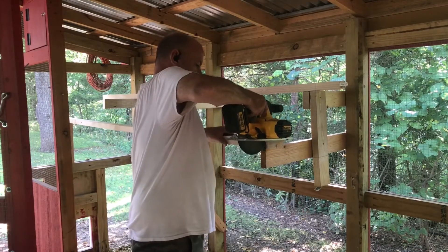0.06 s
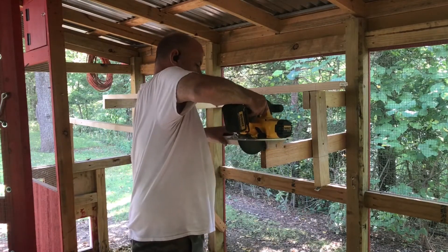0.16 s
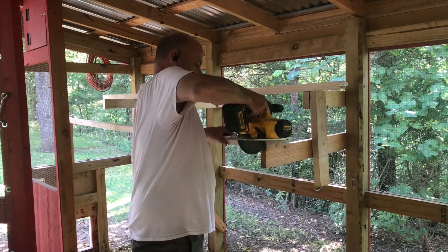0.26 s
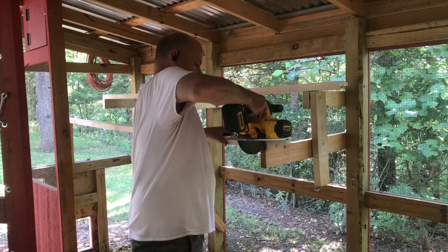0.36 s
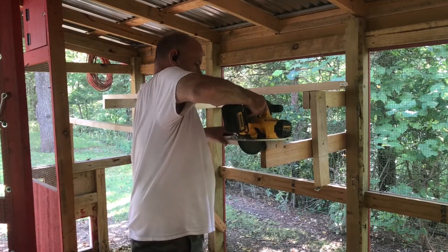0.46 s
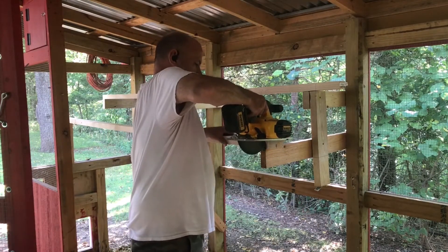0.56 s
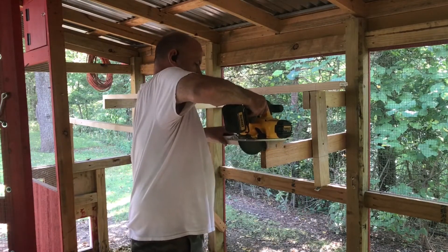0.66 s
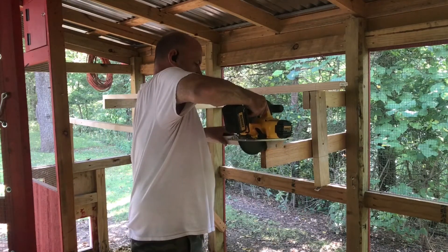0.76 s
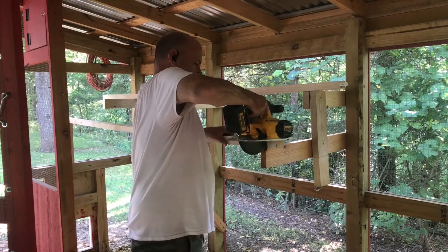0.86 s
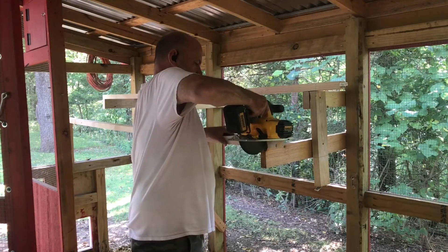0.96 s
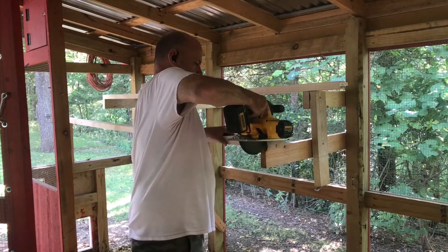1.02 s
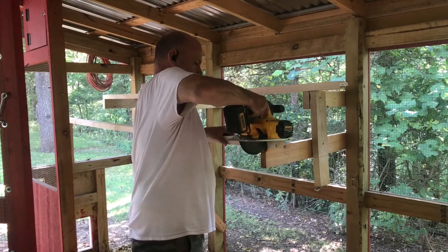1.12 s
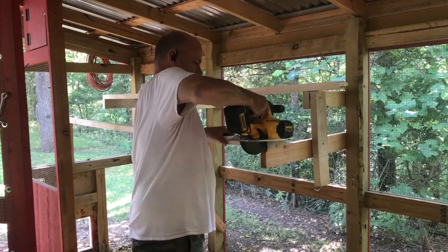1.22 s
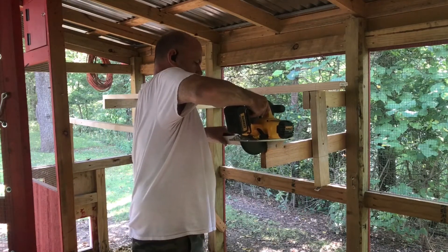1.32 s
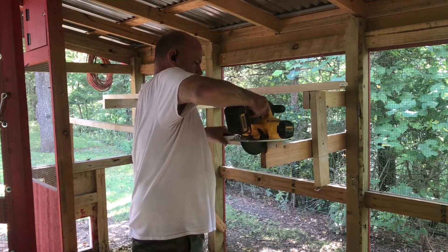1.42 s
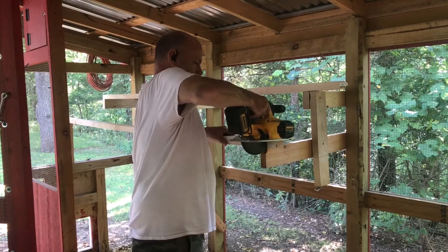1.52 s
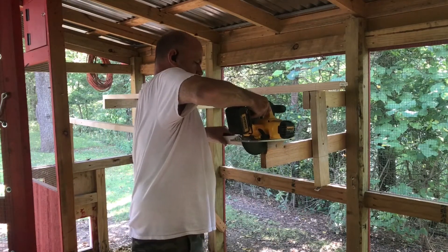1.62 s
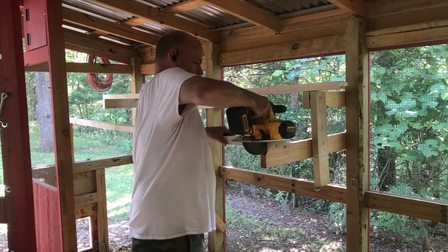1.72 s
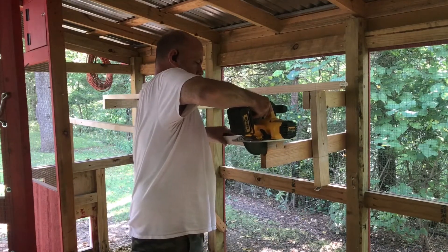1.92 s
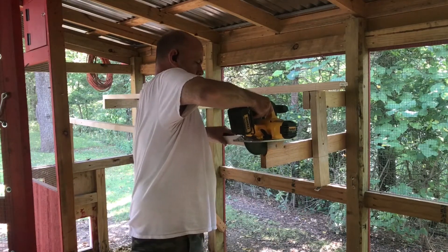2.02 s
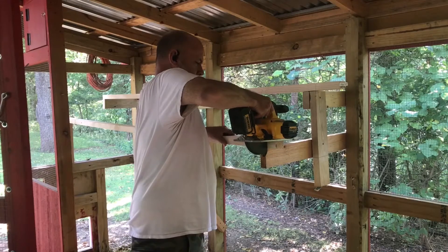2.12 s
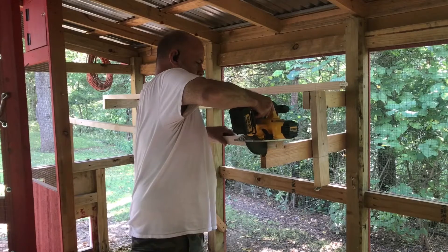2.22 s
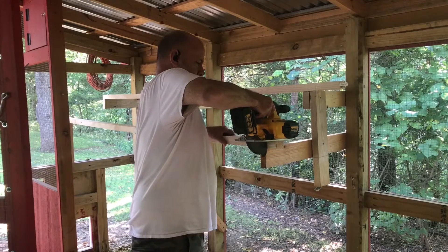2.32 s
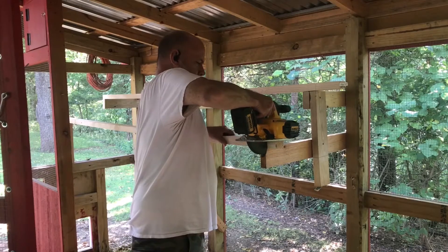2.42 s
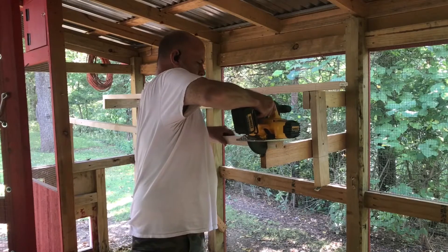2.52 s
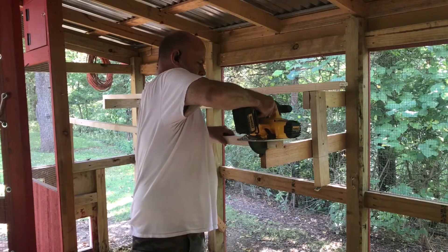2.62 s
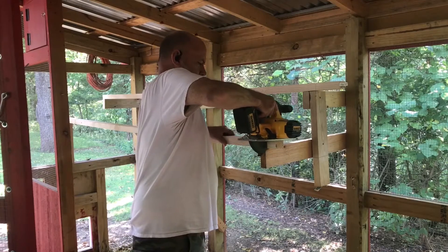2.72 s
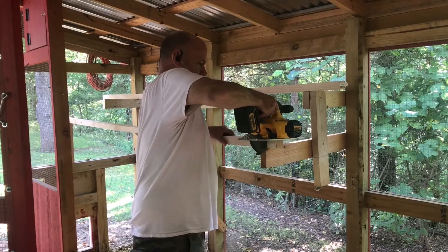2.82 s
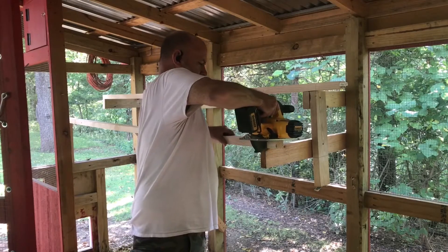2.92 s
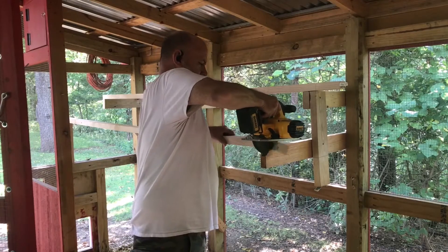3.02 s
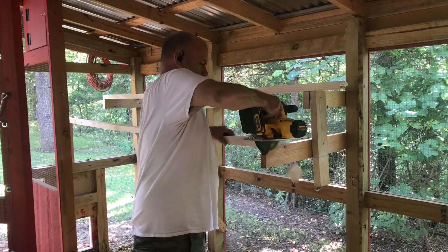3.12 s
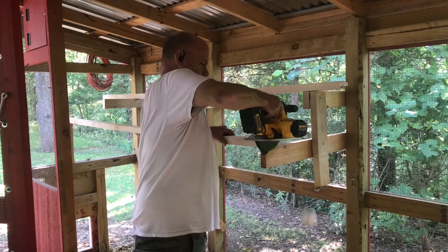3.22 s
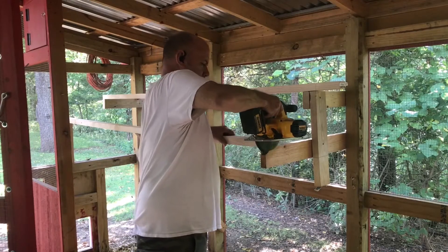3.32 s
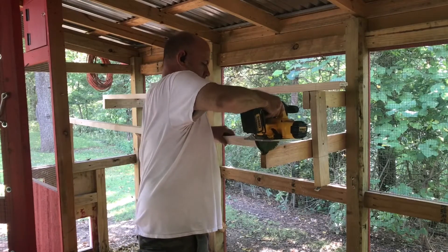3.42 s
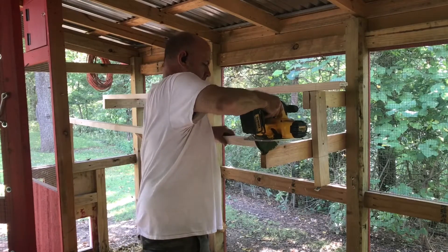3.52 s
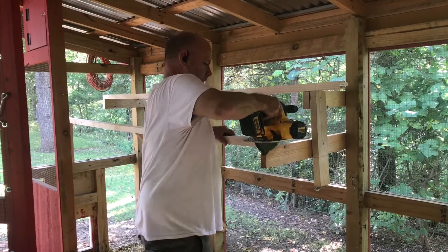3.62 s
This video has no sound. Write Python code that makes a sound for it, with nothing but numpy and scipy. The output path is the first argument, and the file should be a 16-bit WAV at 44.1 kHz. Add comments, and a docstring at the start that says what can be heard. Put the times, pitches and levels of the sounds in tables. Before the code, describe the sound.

A cordless circular saw cuts a wooden board in an open shed, heard fairly near: trigger click, quick spin-up, harsh ringing rasp sagging slightly under load, a short knock, then fast braking and a sharp clack.

```python
"""A cordless circular saw trims a board in an open wooden shed with a tin roof.
Noise bursts, one per tooth, make the rasp and excite the blade's modes; tones locked to the speed make
motor whine, hum and buzz. The speed climbs, sags in the cut and falls under the brake.
Decaying noise makes the clacks of trigger, gears and brake, and a few wavering tones a short knock.
Shaped noise is the air on the microphone and the outdoor hiss; in brief dips the roar yields to clear tones."""
import sys
import numpy as np
from scipy import signal
from scipy.fft import rfft, irfft
from scipy.io import wavfile
from scipy.ndimage import map_coordinates

SR = 44100
rng = np.random.default_rng(int(sys.argv[2]) if len(sys.argv) > 2 else 0)


def log_audio(samples):
    """Write samples as a 16-bit WAV file to the path given in sys.argv[1]."""
    # one column per channel
    frames = np.atleast_2d(samples).T
    # limit to full scale, then quantise
    limited = np.clip(frames, -1, 1)
    pcm = np.round(limited * 32767).astype(np.int16)
    wavfile.write(sys.argv[1], SR, pcm)


N = 160965
TIME = np.arange(N) / SR
WHINE_JITTER, WHINE_FLICKER_DB = .0022, 2.5  # rms share of the pitch; scale of the level flicker


def from_db(db):
    """Level to amplitude: 20 dB is a factor of ten."""
    return 10 ** (np.asarray(db) / 20)


def rms_one(x):
    """Normalization to unit mean power."""
    return x / np.sqrt(np.mean(x ** 2) + 1e-20)


def in_time(rows):
    """Linear interpolation of each column of a curve at every sample."""
    s, *columns = np.transpose(rows)
    return [np.interp(TIME, s, column) for column in columns]


def coloured(x, points):
    """Linear filtering: a spectral envelope, straight in dB over log frequency; unit power."""
    hz, db = np.transpose(points)
    bins = np.maximum(np.arange(N // 2 + 1) * SR / N, 1)
    envelope = from_db(np.interp(np.log(bins), np.log(hz), db))
    return rms_one(irfft(rfft(x) * envelope, N))


def noise(points):
    """Stationary Gaussian noise with a spectral envelope; unit power."""
    return coloured(rng.standard_normal(N), points)


def drift(rate):
    """Low-pass random fluctuation: two equal poles at rate (Hz), unit power."""
    r = np.exp(-2 * np.pi * rate * 10 / SR)  # computed at every tenth sample
    start = rng.standard_normal((N + SR) // 10 + 2)
    slow = signal.lfilter([1], [1, -2 * r, r * r], start)[SR // 10:]  # skip the filter's onset
    return rms_one(np.interp(np.arange(N) / 10, np.arange(len(slow)), slow))


def resonance(x, hz, width_hz):
    """A damped mode: a two-pole resonator driven by x; unit power."""
    r = np.exp(-np.pi * width_hz / SR)
    poles = [1, -2 * r * np.cos(2 * np.pi * hz / SR), r * r]
    return rms_one(signal.lfilter([1, 0, -1], poles, x))


def dying(s, t60):
    """Exponential decay after a sudden start: 60 dB in t60 seconds."""
    return (TIME >= s) * np.exp(-np.log(1000) * np.maximum(TIME - s, 0) / t60)


def tone(hz):
    """Frequency modulation: the phase is the integral of the pitch curve."""
    return np.sqrt(2) * np.sin(2 * np.pi * (np.cumsum(hz) / SR + rng.random()))


def outdoors():
    """Stationary broadband noise: the steady hiss of the surroundings."""
    # spectrum of the hiss: pitch_hz, density_db (relative, per Hz)
    colour = [(88, -39), (150, 11), (221, -35), (350, -23), (850, -12), (991, -16), (2360, -17), (5840, -5),
              (15000, -41)]
    return from_db(-53) * noise(colour)


def buffeting():
    """Turbulent pressure on the microphone: low noise of varying level."""
    # strength of the air: start_s, level_db
    levels = [(0, -51), (.12, -49), (.25, -56), (.45, -48.5), (1.0, -50), (3.1, -50.5), (3.18, -36),
              (3.35, -43), (3.5, -38), (3.65, -43)]
    # spectrum of the air: pitch_hz, density_db (relative, per Hz)
    colour = [(15, -27), (30, 2), (50, 10), (100, 2), (160, -0.5), (300, -8.5), (1000, -41.5)]
    return from_db(in_time(levels)[0]) * noise(colour)


def shed(x):
    """Reverberation: direct sound plus a decaying wash of reflections from posts and roof."""
    delay_s, t60_s, wash_db = .003, .16, -2.5
    wash = rng.standard_normal(N) * dying(delay_s, t60_s)
    reflected = signal.fftconvolve(x, wash / np.linalg.norm(wash))[:N]
    return x + from_db(wash_db) * reflected


def clacks():
    """Impact excitation: trigger, gear slack and brake rattle the housing, which decays."""
    # impacts of trigger, gears and brake: start_s, level_db, t60_s
    impacts = [(0.1149, -26, 0.066), (.168, -49, 0.08), (3.49, -23.5, 0.13), (3.504, -31, 0.053)]
    # spectrum of the housing: pitch_hz, density_db (relative, per Hz)
    colour = [(200, -33), (600, -2.5), (1000, -1), (1430, 2.5), (1950, -3), (2600, 2), (3400, -3.5),
              (5200, 0.5), (7000, -10), (10000, -15), (16000, -71)]
    tail_db, tail_t60_s = -11, .32  # tail relative to each impact
    settle_s, settle_length_s, settle_db = 3.587, .015, -41
    level = 0
    for s, db, t60 in impacts:
        decay = dying(s, t60) + from_db(tail_db) * dying(s, tail_t60_s)
        level = level + from_db(db) * decay
    # a soft rattle as the blade settles
    level = level + from_db(settle_db) * np.exp(-((TIME - settle_s) / settle_length_s) ** 2)

    trigger_s = impacts[0][0]
    # the handle's hollow ring
    hollow = resonance(rng.standard_normal(N), 1480, width_hz=220)
    handle = from_db(-28) * dying(trigger_s, t60=.096) * hollow
    # the switch snaps over: two resonators in series
    crack = resonance(rng.standard_normal(N), 5300, width_hz=2500)
    crack = resonance(crack, 5300, width_hz=2500)
    snap = from_db(-22) * dying(trigger_s, t60=.014) * crack
    # the gears take up their slack
    ping = from_db(-31) * dying(.167, t60=.22) * np.sin(2 * np.pi * 3970 * TIME)
    return level * noise(colour) + handle + ping + snap


def knock():
    """Sum of wavering tones: a short knock, held briefly, then dying fast."""
    # tones of the knock: pitch_hz, level_db (relative)
    partials = [(635, -8), (925, -5.5), (1290, -5.5), (1500, -7.5), (1670, -4), (1880, -10)]
    start_s, attack_s, hold_s, t60_s = 3.117, .004, .019, .055  # hold counts from the start
    level_db, jitter = -15, .018  # jitter is the rms share of the pitch
    attack = np.clip((TIME - start_s) / attack_s, 0, 1)
    level = attack * np.exp(-np.log(1000) * np.maximum(TIME - start_s - hold_s, 0) / t60_s)
    tones = sum(from_db(level_db + db) * tone(hz * (1 + jitter * drift(92.5))) for hz, db in partials)
    return level * tones


def blade_speed():
    """Rotational kinematics: the speed climbs, sags under load and falls under the brake."""
    # speed while running up: start_s, speed_turns_per_s
    run_up = [(.165, 1), (.21, 14.5), (.25, 26.4), (.28, 33), (.31, 43), (.37, 57.7), (.4, 62.6),
              (.45, 69.5)]
    # speed while cutting: start_s, speed_turns_per_s
    cutting = [(.5, 73.5), (.55, 76.3), (.66, 79.4), (.79, 80.7), (1.11, 80.9), (1.38, 79.8), (1.7, 77.3),
               (1.83, 75.1), (1.95, 74.8), (2.14, 73.5), (2.27, 71.5), (2.42, 71.3), (2.6, 72.6),
               (2.8, 74.6), (3.03, 76.5), (3.29, 79.5)]
    # speed while braking: start_s, speed_turns_per_s
    braking = [(3.31, 73.6), (3.345, 55), (3.41, 30), (3.485, 1)]
    return in_time(list(run_up) + list(cutting) + list(braking))[0]


def hum(speed, waver_db):
    """Forced vibration: the blade shakes the board once a turn, with harmonics of its rotation."""
    # overtones of the shaking: multiple_of_blade_speed, level_db (relative)
    harmonics = [(2, -45), (3, -45), (4, -53), (5, -54), (6, -48), (8, -45), (9, -55), (11, -59),
                 (12, -42.5)]
    # strength of the shaking: start_s, fundamental_db, overtone_gain_db
    levels = [(.3, -53, -13), (.72, -56, -13.5), (.9, -41, -8.5), (1.3, -40, -8.5), (1.6, -45, -1),
              (2.05, -46.5, -3.5), (2.45, -41.5, -5.5), (2.7, -45, -4.5), (3.05, -46, -4.5),
              (3.3, -39, -11), (3.48, -89, -8)]
    first, upper = in_time(levels)
    overtones = 0
    for k, db in harmonics:
        wavering = from_db(db + waver_db * np.tanh(drift(10)))
        overtones = overtones + wavering * tone(k * speed)
    return from_db(first) * tone(speed) + from_db(upper) * overtones


def buzz(speed):
    """Order-locked partials: deep in the cut the loaded saw buzzes at multiples of its speed."""
    # partials of the buzz: multiple_of_blade_speed, level_db (relative)
    orders = [(18.7, -40), (23.7, -40), (35.7, -39), (37.5, -38), (45.7, -36), (47.7, -39), (75.8, -40),
              (85.4, -39), (90.3, -39), (92.4, -38), (109.2, -43)]
    # strength of the buzz: start_s, gain_db
    levels = [(.2, -33.5), (1.4, -12), (1.85, -2), (2.3, -0.5), (2.8, -1), (3.15, 0.5), (3.45, -39)]
    partials = 0
    for k, db in orders:
        flickering = from_db(db + WHINE_FLICKER_DB * drift(36))
        partials = partials + flickering * tone(k * speed * (1 + WHINE_JITTER * drift(30)))
    return partials * from_db(in_time(levels)[0])


def motor(speed):
    """Rotating machinery: armature and fan whine at multiples of motor speed; gears howl under torque."""
    # armature whine: multiple_of_motor_speed, level_db (relative)
    orders = [(1, -47.5), (2, -65), (5, -41), (7, -52.5), (8, -49), (11, -40.5), (13, -32), (15, -43.5),
              (18, -41), (20, -42.5), (22, -53)]
    # strength of the whine: start_s, gain_db
    whine_levels = [(.17, -25), (.45, -7), (.62, 2.5), (.75, 0.5), (.9, -3.5), (1.3, -1.5), (1.55, -1),
                    (2.4, -2.5), (3.05, -1.5), (3.3, -4), (3.48, -26)]
    # gear howl, speeding up or braking: start_s, level_db, octave_level_db
    howl_levels = [(.17, -56, -46), (.26, -29, -26), (.33, -23, -31), (.38, -24.5, -25), (.46, -42, -26.5),
                   (.54, -60, -46), (3.26, -55, -46), (3.31, -29, -33), (3.35, -26, -38), (3.419, -37, -48),
                   (3.48, -60, -58)]
    # whistle of the cooling fan: start_s, level_db
    fan_levels = [(.17, -65), (.46, -38), (.56, -30.5), (.72, -30), (.95, -37), (1.1, -33), (1.36, -29),
                  (1.5, -48), (1.74, -30), (1.9, -37), (2.6, -38), (3.03, -31), (3.2, -34), (3.48, -65)]
    gear_ratio, pinion_teeth, fan_blades = 5.06, 9, 10
    howl_width_hz = 110  # rate of the random modulation; doubled for the octave

    hz = gear_ratio * speed * (1 + WHINE_JITTER * drift(37.1))
    whine = 0
    for k, db in orders:
        flickering = from_db(db + WHINE_FLICKER_DB * np.tanh(drift(25)))
        whine = whine + flickering * tone(k * hz)
    howl = 0
    for octave, level in zip((1, 2), in_time(howl_levels)):
        # random amplitude and phase roughen the tooth-meshing tone
        grind = drift(howl_width_hz * octave) + 1j * drift(howl_width_hz * octave)
        meshing = np.exp(2j * np.pi * octave * pinion_teeth * np.cumsum(hz) / SR)
        howl = howl + from_db(level) * np.real(grind * meshing)
    fan_level = from_db(in_time(fan_levels)[0] + WHINE_FLICKER_DB * np.tanh(drift(30)))
    fan = fan_level * tone(fan_blades * hz)
    return whine * from_db(in_time(whine_levels)[0]) + fan + shed(howl)


def bites(speed):
    """Periodically modulated noise: each tooth tears a chip, partly alike on every turn."""
    teeth_count, bite_share, decay = 18, .4, .25  # decay in tooth spacings
    tooth_spread_db, chip_spread_db, wobble_db = 2, 4, 2.5  # the spreads scale the draws below
    repeat_share = .25  # share of the tearing's power that is the same on every turn

    turns = np.cumsum(speed) / SR
    tooth, since = np.divmod(turns * teeth_count, 1)
    tooth = tooth.astype(int)
    db = tooth_spread_db * rng.uniform(-0.63, 1, teeth_count)[tooth % teeth_count]
    db = db + chip_spread_db * rng.uniform(-1.1, 1, N)[tooth]
    db = db + wobble_db * np.sin(2 * np.pi * turns)
    bursts = rms_one(from_db(db) * np.exp(-since / decay))

    rim = rng.standard_normal(size=560)  # noise written once around the rim
    repeating = map_coordinates(rim, [turns % 1 * len(rim)], mode="wrap")
    repeating = repeating * np.sqrt(speed / speed.max())
    fresh = rng.standard_normal(N)
    tearing = np.sqrt(repeat_share) * repeating + np.sqrt(1 - repeat_share) * fresh
    return tearing * np.sqrt(1 - bite_share + bite_share * bursts ** 2)


def blade(teeth):
    """Modal resonance: modes swell and fade as the kerf grips another part; the blade screeches as it binds."""
    # modes of the steel blade: pitch_hz, level_db (before flicker and speed), loudest_s, half_length_s
    modes = [(822.5, -41, 1.08, 0.77), (1367, -37, 2.3, 1.1), (1702, -36.5, 2.9, .3),
             (1894, -35.5, 2.7, 0.56), (2620, -38, 1.9, .5), (2982, -27.5, 1.15, .17),
             (3043, -27, 2.45, 0.46), (3192, -39, 2.57, 0.34), (3429, -34, 2.1, 0.39),
             (3850, -41, 2.3, 0.32), (4077, -38.5, 1.3, 0.65), (5013, -32, 1.2, 0.275),
             (5127, -29, 1.6, 0.237), (5470, -32, 1.6, 0.46), (5780, -32.5, 1.3, .3),
             (6047, -40.5, 1.5, 0.55), (6220, -38.5, 1.4, 0.18), (6614, -36, .9, .9),
             (6870, -32.5, 1.7, .3), (7655, -32, 0.56, 0.193), (8183, -38, 1.3, .7), (8380, -33.5, 2.1, .4)]
    rest_db, flicker_db = -17.5, 1.2  # floor of each swell; largest level flicker
    bind_s, bind_length_s, bind_hz, bind_db = 1.505, .04, 5800, -19
    ring = 0
    for hz, db, s, half in modes:
        swell = np.maximum(np.exp(-((TIME - s) / half) ** 2 / 2), from_db(rest_db))
        level = from_db(db + flicker_db * np.tanh(drift(6))) * swell
        ring = ring + level * resonance(teeth, hz, width_hz=16)
    screech = resonance(teeth, bind_hz, width_hz=1300)
    screech = resonance(screech, bind_hz, width_hz=1300)
    return ring + screech * from_db(bind_db) / (1 + ((TIME - bind_s) / bind_length_s) ** 2)


def rasp(teeth, flutter_db):
    """Broadband fracture noise: tearing in three fluttering ranges, with sawdust sizzling on top."""
    # strength of the tearing before the trims below: start_s, low_db, mid_db, treble_db
    levels = [(.17, -56, -44, -53), (.235, -32.5, -26.5, -25.5), (.33, -29, -27, -23),
              (0.422, -34, -21.5, -20), (.6, -33, -22.5, -24.5), (0.861, -35, -21.5, -23),
              (0.999, -36, -21.5, -18.5), (1.301, -30, -23, -21), (1.481, -30, -18, -13),
              (1.7, -32.5, -21, -18), (2.05, -31, -20.5, -15.5), (2.499, -33, -19, -18.5),
              (3.05, -30.5, -19.5, -19.5), (3.2, -28.5, -22, -21.5), (3.31, -31, -23, -21.5),
              (3.41, -37, -34, -36.5), (3.48, -40, -42, -47)]
    # spectrum of the tearing: pitch_hz, gain_db (relative)
    colour = [(200, -15), (310, -18), (430, -9.5), (530, -14), (680, -5.5), (850, -9.5), (1400, -2.5),
              (2100, 2.5), (3200, 0.5), (4400, 0.5), (6700, 1), (8000, -5), (9600, -7), (10600, -25),
              (13000, -22), (16000, -54)]
    # strength of the flying sawdust: start_s, level_db
    sizzle_levels = [(.17, -66), (.35, -57.5), (.8, -70), (1.05, -47.5), (1.5, -39.5), (2.15, -41),
                     (2.6, -49), (3.1, -61), (3.48, -75)]
    # spectrum of the sawdust: pitch_hz, gain_db (relative)
    sizzle_colour = [(5000, -41), (9500, 4), (11000, 2), (12500, -2.5), (14000, -14), (16000, -9.5)]
    ranges_hz = [(230, 1400), (1400, 4500), (4500, 19000)]
    trims_db = (-3.5, -4, -4)
    source, out = coloured(teeth, colour), 0
    for edges, level, trim in zip(ranges_hz, in_time(levels), trims_db):
        bandpass = signal.butter(4, edges, "band", fs=SR, output="sos")
        band = rms_one(signal.sosfiltfilt(bandpass, source))
        out = out + band * from_db(level + trim + flutter_db * np.tanh(drift(17.7)))
    return out + coloured(teeth, sizzle_colour) * from_db(in_time(sizzle_levels)[0])


def dipping(roar):
    """Spectral peak resynthesis: in brief dips the roar falls away and some strong pitches stay as tones."""
    # dips of the roar: centre_s, half_length_s, depth (0 to 1), number_of_tones
    dips = [(.292, .011, .75, 3), (.774, .018, .995, 17), (.912, .01, .8, 12), (1.234, .01, .8, 12),
            (1.447, .012, .85, 12), (2.182, .018, .995, 17), (2.644, .012, .8, 8), (2.75, .01, .75, 5),
            (3.13, .014, .8, 10)]
    ring_db, apart_hz, chance_db = -1.5, 110, 5  # chance shuffles the ranking of the peaks
    out, bins = roar, np.arange(N // 2 + 1) * SR / N
    for s, half, depth, tones in dips:
        shape = np.exp(-((TIME - s) / half) ** 4)
        strength = np.abs(rfft(roar * shape))
        peaks = signal.find_peaks(strength, distance=apart_hz * N / SR)[0]
        rank = strength[peaks] * from_db(chance_db * rng.standard_normal(N)[peaks])
        chosen = peaks[np.argsort(-rank)[:tones]]
        ring = sum(strength[k] * np.sin(2 * np.pi * (bins[k] * TIME + rng.random())) for k in chosen)
        level = from_db(ring_db) * np.sqrt(np.average(roar ** 2, weights=shape))
        left = 1 - depth * shape
        # the tones fade in as the roar fades out
        out = out * left + level * rms_one(ring) * np.sqrt(1 - left ** 2)
    return out


def scene():
    """Superposition: saw in the shed, air and hiss, clacks and knock; the same in both channels."""
    start_s, stop_s, fade_s = .16, 3.485, .037  # the fade-out begins at the stop
    speed = blade_speed()
    fade_in = np.clip((TIME - start_s) / fade_s, 0, 1)
    running = fade_in * np.clip((stop_s - TIME) / fade_s + 1, 0, 1)
    teeth = bites(speed)
    ringing = blade(teeth) * np.sqrt(speed / speed.max())
    tearing = shed(running * rasp(teeth, flutter_db=1.47))
    saw = tearing + running * (hum(speed, waver_db=4.5) + ringing + motor(speed) + buzz(speed))
    air = buffeting() + outdoors()
    return np.tile(dipping(saw + air) + clacks() + knock(), (2, 1))


def record(dry):
    """Soft saturation rounds the highest peaks; a steep low-pass then cuts the top."""
    ceiling = .85
    rounded = dry / (1 + (dry / ceiling) ** 8) ** (1 / 8)
    lowpass = signal.ellip(12, .1, 80, 15900, fs=SR, output="sos")  # ripple dB, rejection dB, cutoff Hz
    return signal.sosfilt(lowpass, rounded)


dry = scene()
out = record(dry)
log_audio(out)
```